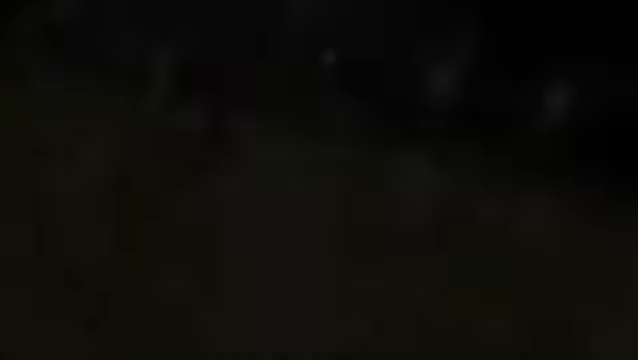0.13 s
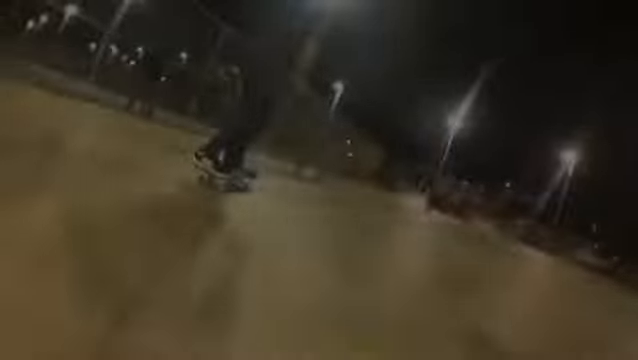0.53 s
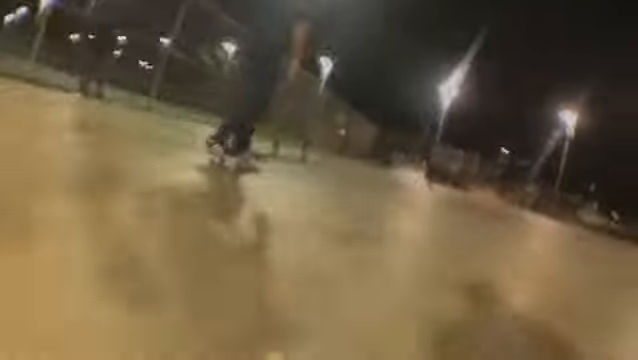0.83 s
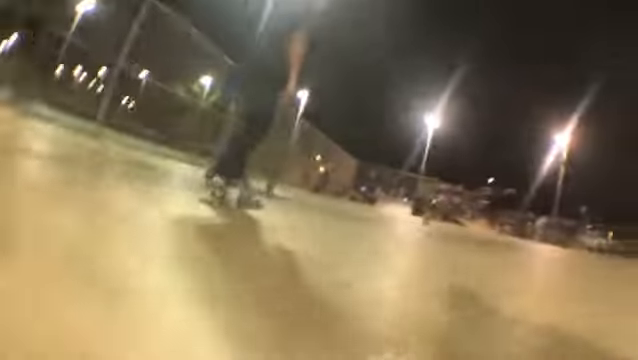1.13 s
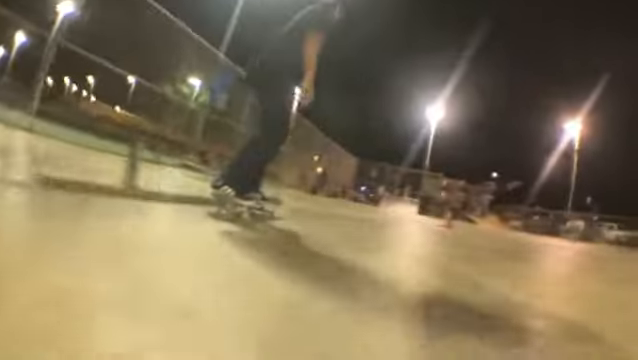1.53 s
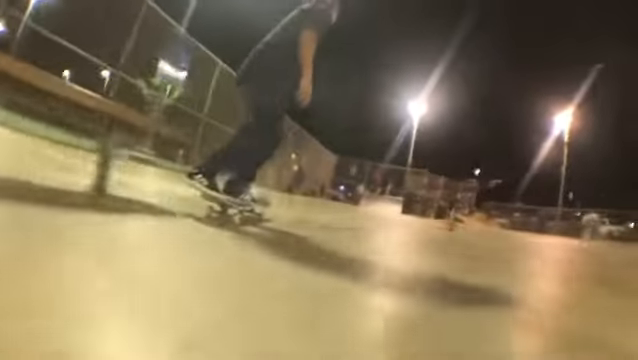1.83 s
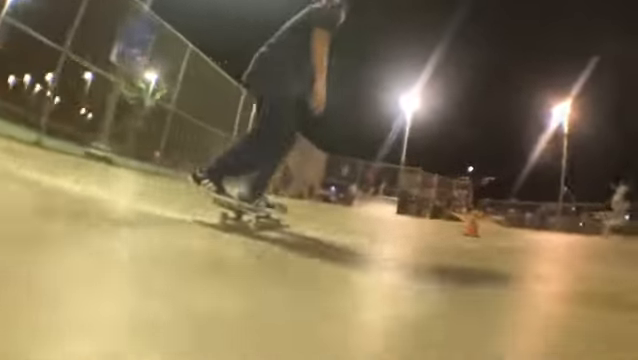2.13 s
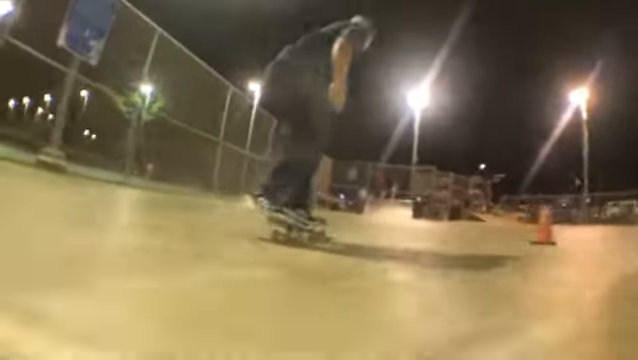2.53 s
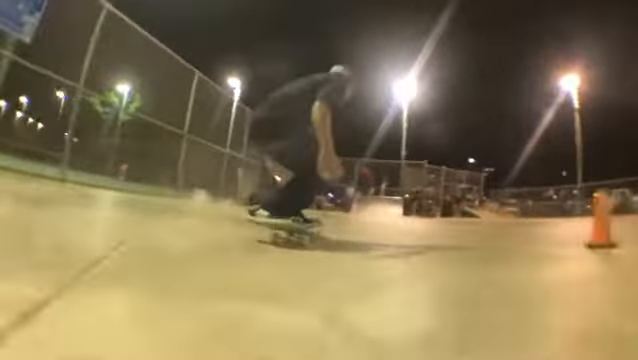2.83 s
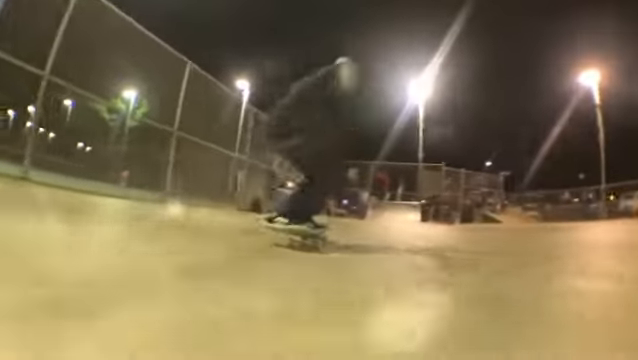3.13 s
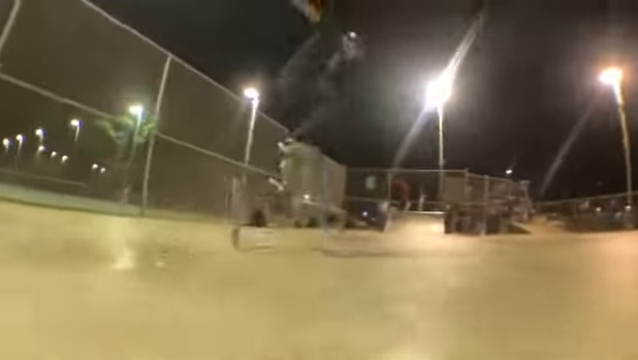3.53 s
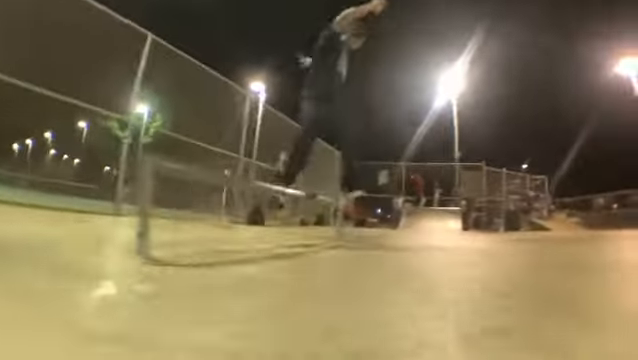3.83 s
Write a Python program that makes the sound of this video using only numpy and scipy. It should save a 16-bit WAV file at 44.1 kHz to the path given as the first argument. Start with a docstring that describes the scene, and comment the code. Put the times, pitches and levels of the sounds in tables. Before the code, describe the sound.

Skateboard wheels roar over gritty concrete, then a sharp pop and metallic clatter on a rail.

```python
"""Night, concrete, a stereo pair: two skateboards fade in, one close below the microphones, one ahead.
Grit shakes wheels, decks and trucks into roar, rumble, rattle and hiss; joints in the slab knock as bursts.
Halfway the board ahead pops, and bumps then boom in the near deck as damped low modes.
Late on it strikes a steel rail, whose modes ring unsteadily under a noisy clatter; brief squeaks,
made of wavering sines, follow as the rolling grows quieter."""
import sys
import numpy as np
from scipy import signal
from scipy.fft import rfft, irfft
from scipy.io import wavfile

SR = 44100
rng = np.random.default_rng(int(sys.argv[2]) if len(sys.argv) > 2 else 0)


def unload_wav(signal):
    """Save mono or channel-first audio to the path in sys.argv[1] as 16-bit WAV at rate SR, clipped to [-1, 1]."""
    wavfile.write(
        sys.argv[1],
        SR,
        np.round(np.clip(np.atleast_2d(signal).T, -1, 1) * 32767).astype(np.int16),
    )


def to_linear_factor(level_db):
    """Convert decibel levels (scalar or array-like) to linear amplitude factors."""
    exponent = np.asarray(level_db, float) / 20
    return 10 ** exponent


N = 176400   # samples: 4 s
T = np.arange(N) / SR

# Levels of the rolling as it fades in and passes. Each row: time in seconds, wheel roar in dB,
# deck rumble in dB, hiss of grit in dB, truck rattle in dB.
ROLLING_LEVELS = [(.12, -41.5, -55.5, -60.5, -58), (.3, -37, -41.5, -56.5, -53.5),
                  (.45, -34.5, -40, -47.5, -46), (.61, -30.5, -35, -46.5, -48.5),
                  (.805, -27.5, -38, -44, -43.5), (.84, -22, -31, -41.5, -38.5),
                  (.98, -21.5, -30, -40, -35.5), (1.15, -26.5, -33.5, -41, -38.5),
                  (1.3, -24.5, -31.5, -42.5, -37.5), (1.58, -24, -28.5, -39.5, -35.5),
                  (1.85, -24.5, -26.5, -40, -35), (2.04, -25.5, -31.5, -38, -36.5),
                  (2.19, -29, -25.5, -43.5, -37), (2.43, -26.5, -32, -41, -36.5),
                  (2.6, -27.5, -28.5, -38, -35), (2.7, -32, -33, -48, -40), (2.8, -23, -23.5, -40.5, -34),
                  (2.95, -26, -24.5, -44.5, -37), (3.16, -27.5, -28.5, -44.5, -38),
                  (3.28, -28, -27, -43, -38), (3.36, -32, -34.5, -48, -43),
                  (3.6, -37.5, -38.5, -44.5, -43.5), (3.85, -41.5, -39, -49, -50),
                  (4.0, -35.5, -41.5, -49, -41.5)]
# Level of the deepest rumble. Each row: time in seconds, level in dB.
DRONE_LEVELS = [(.12, -58), (.6, -41.5), (1.2, -34.5), (1.8, -34.5), (2.4, -37), (3.0, -37), (3.5, -39),
                (3.85, -51), (4.0, -32)]
# Resonances of wheels, decks and trucks, and of the deepest rumble. Each row: centre in Hz, width of one
# of two stacked resonators in Hz, relative level in dB, left over right in dB, phase lead of the right
# microphone in radians, likeness of the two microphones from 0 to 1.
ROAR_MODES = [(343.5, 145, -7.5, 1, -1.5, 0.61), (482, 180, -5.5, 8, -1.5, 0.63),
              (706, 220, -5, 10.5, -1.47, 1), (852, 196, -7.5, 13.5, -2.5, 0.87),
              (937, 93, -1.5, 3.5, -1.5, 0.84), (1149, 220, -3, 1.5, -0.5, 0.69),
              (1345, 153, -3, -4.5, -0.2, 0.68), (1500, 140, 0, -4.5, 0.5, 0.62),
              (1694, 122, -8.5, -5, 0.1, 0.36)]
RUMBLE_MODES = [(132.8, 27.7, 0.5, 0.5, -1.36, 0.94), (168, 47, -2, -2, -1.07, 0.75),
                (209, 131, -5.5, 2.5, -1.22, 0.8)]
RATTLE_MODES = [(2156, 160, 6, -3, -9, 0.79), (2830, 860, 0.5, 0, -2.5, 0.94),
                (3400, 1160, -1.5, 4, -3.5, 0.71), (4300, 1200, -4.5, 3.5, 1.65, 1),
                (5440, 3160, -4.5, 0.5, -1, 0.17)]
DRONE_MODES = [(45.5, 10, 1, .5, -1.1, .15), (73.8, 51, 6.7, 0.37, -0.15, 0.16)]
# Spectrum of the hiss. Each row: frequency in Hz, relative density in dB per Hz.
HISS_SPECTRUM = [(3000, -28), (5000, -9), (7000, -3), (9000, 3), (11000, -1.5), (13000, -5.5),
                 (15000, -6.5), (16500, -60.5)]
# Pitch of the wheels' whine. Each row: time in seconds, frequency in Hz.
WHINE_PITCH = [(.5, 4300), (.9, 4000), (1.1, 4300), (1.3, 4200), (1.45, 4350), (1.58, 4250), (1.8, 4450),
               (1.95, 4300), (2.4, 4300), (3.3, 4200)]
# Knocks of wheels, tail and trucks. Each row: start in seconds, then crack, low knock, body, clack and
# snap in dB before the stereo spread, length in seconds before the stretch of its band.
KNOCKS_HEARD = [(0.2, -38.5, -37.5, -51, -66, -64, 0.0041), (0.4544, -24.5, -43, -31, -36, -28.5, 0.004),
                (0.8227, -36, -50, -33.5, -59, -52, 0.0079), (1.925, -32, -51, -31, -32, -31, 0.0062),
                (1.953, -27, -39, -26, -39, -37, 0.0063), (2.0634, -22, -20, -26, -44, -44, 0.0032),
                (2.0747, -13.5, -28, -16, -30, -24.5, 0.0038), (2.086, -30, -35.5, -27.5, -35, -41, 0.013),
                (2.102, -19, -40, -40, -37, -33, .002), (2.115, -25.5, -30, -32, -38, -36, 0.0086),
                (2.175, -17.5, -30, -22, -50, -43, 0.003), (2.203, -23.5, -50, -22.5, -55, -56, 0.004),
                (2.497, -24, -32, -33, -31, -42, 0.0031), (2.5345, -13.5, -25.5, -17, -28.5, -39, 0.0076),
                (2.568, -16.5, -30, -17.5, -26.5, -38, 0.012), (2.8, -31, -30, -28, -43, -45, 0.0029),
                (2.813, -30, -23.5, -34, -36, -38, 0.0032), (2.842, -24, -29.5, -30, -41, -28, 0.0024),
                (2.932, -36, -30, -37, -45, -45, 0.0032), (2.9376, -29.5, -23.5, -22, -35, -51, 0.0082),
                (2.976, -40, -36, -32, -44, -55, 0.0094), (3.303, -43, -40, -28, -39, -43, 0.0081),
                (3.316, -14, -19, -10.5, -14.5, -24, 0.008), (3.334, -41, -49, -26, -38, -47, 0.0024),
                (3.454, -47, -52, -31.5, -44, -40, 0.0094), (3.4699, -18, -23, -12, -30, -26, 0.0036),
                (3.4746, -15, -19, -10, -20, -23, 0.0061), (3.496, -42, -45, -29, -30, -41, 0.0051),
                (3.526, -38, -50, -40, -35, -42, 0.0026), (3.581, -54, -49, -33, -52, -52, 0.0039),
                (3.701, -16.5, -16, -13.5, -24, -36, 0.004), (3.721, -49, -34, -27.5, -45, -45, 0.026),
                (3.7434, -15, -28.5, -20.5, -37, -21.5, 0.013),
                (3.7612, -10, -25, -15.5, -21.5, -12.5, 0.0025)]
# Bands of crack, low knock, body, clack, snap. Each row: low edge in Hz, high edge in Hz.
KNOCK_EDGES = [(6000, 12500), (200, 500), (500, 1750), (1750, 3400), (3400, 5500)]
# Deck booms. Each row: start in seconds, strength of the blow in dB.
DECK_BLOWS = [(2.064, -20), (2.539, -18.5), (2.8, -14), (2.814, -13), (2.8442, -6), (2.866, -15),
              (2.931, -9.5), (2.979, -18), (3.025, -18.5), (3.073, -18), (3.746, -17)]
# Modes that a blow rings in the deck. Each row: frequency in Hz, relative level in dB, t60 in seconds.
DECK_MODES = [(144.3, 0, 0.053), (199, -7, 0.058)]
# Knocks with a clear pitch. Each row: start in seconds, frequency in Hz, mean level in dB, t60 in seconds.
PITCHED_KNOCKS = [(0.8248, 1500, -9.5, 0.035), (2.077, 783, -16.5, 0.034), (2.122, 610, -12.5, 0.04),
                  (2.571, 1040, -11, 0.052), (2.944, 1400, -12.5, 0.033), (3.3187, 3200, -10, 0.017),
                  (3.322, 2250, -8.5, 0.023), (3.472, 960, -15, 0.022), (3.5842, 1410, -18, 0.023),
                  (3.704, 2300, -22, 0.03), (3.705, 853, -19.5, 0.35), (3.752, 228, -19.5, 0.12)]
# Strikes on the rail. Each row: start in seconds, strength in dB at 3000 Hz, hardness in dB per octave,
# clatter in dB before the stereo spread.
RAIL_STRIKES = [(3.478, -27.5, -1.5, -24.5), (3.701, -40, -10, -30), (3.745, -30, 6, -19),
                (3.763, -38.5, -10, -30)]
# Rail modes. One value each: frequency in Hz.
RAIL_PITCHES = [846, 3008, 3431, 3554, 4565, 5157, 5372, 5940, 6097, 8159, 8407, 8716, 8922, 9200, 9380,
                9543, 9610, 9691, 9800, 10504, 12870, 13573, 14400, 15300]
# The same modes in the same order. Each row: relative level in dB, t60 in seconds.
RAIL_RINGS = [(-9.5, 1.04), (-10.5, 1.4), (-14, .12), (-12, .15), (-4, 0.23), (-4.5, 0.38), (-26, 0.69),
              (0, 0.25), (-15, 0.34), (-5, 1.05), (2, 0.27), (-10, .17), (-14, 0.2), (-14, 0.11),
              (-10, 0.26), (-5.5, 0.29), (4.5, 0.24), (0.5, 0.12), (-12, 0.26), (-3, 0.23), (-25, 0.36),
              (-26, .14), (-15, .14), (-19, 0.52)]
# Rail modes too crowded to tell apart. Each row: frequency in Hz, relative density in dB per Hz.
CLATTER_SPECTRUM = [(1000, 6), (2500, -19), (4500, 5), (6500, -14), (9000, 10), (12000, -26), (16000, -21)]
# Brief squeaks. Each row: start in seconds, centre frequency in Hz, peak level in dB, length in seconds.
SQUEAKS_HEARD = [(3.66, 4620, -42, 0.019), (3.969, 4540, -37.5, 0.024)]

START_S, START_RISE_S = 0.12, 0.0081
GRIT_PER_S, GRIT_SPREAD_DB = 1600, 3
LAG_ABOVE_HZ, LEFT_LAG_S = 3800, 0.0002155   # this treble reaches the right microphone first
KNOCK_RISE_S, KNOCK_T60_S, KNOCK_TAIL_DB, KNOCK_TAIL_T60_S = 0.0056, 0.02, -25.5, 0.36
CRACK_STRETCH, THUD_STRETCH = 0.77, 1.6   # against the body: cracks are quicker, low knocks last longer
TOCK_WAVER_DB = 3
RAIL_STEADY, RAIL_WAVER_PER_S = 0.8, 60   # steady share of a mode's ring, rate of the rest
RAIL_LUCK_DB, CLATTER_T60_S = 0.76, 0.21
RATTLE_CUT_HZ, RATTLE_DB = 6400, -1   # level against the rattle curve
WHINE_DB, WHINE_PATCHY_DB = -11, 1   # level against the rattle curve
WHINE_WIDTH_HZ, WHINE_WANDER_HZ = 290, 70.1
TOP_HZ = 16600


def rms_one(x):
    """Scale to rms 1."""
    return x / np.sqrt(np.mean(x ** 2) + 1e-20)


def drift(rate):
    """Slow chance with spread 1: noise through two equal lowpass poles at rate Hz, on every 40th sample."""
    r = np.exp(-80 * np.pi * rate / SR)
    noise = rng.standard_normal(N // 40 + 2002)
    slow = signal.lfilter([1], [1, -2 * r, r * r], noise)[2000:]
    return np.interp(np.arange(N) / 40, np.arange(len(slow)), rms_one(slow))


def coloured(x, spectrum):
    """Give noise a spectrum; rms 1."""
    hz, db = np.transpose(spectrum)
    f = np.maximum(np.fft.rfftfreq(N, 1 / SR), 1)
    gain = to_linear_factor(np.interp(np.log(f), np.log(hz), db, left=-90))
    return rms_one(irfft(rfft(x) * gain, N))


def grit():
    """Dense random grains of uneven size under the wheels; rms 1."""
    size_db = GRIT_SPREAD_DB * np.minimum(rng.exponential(1, N), 5)
    size = to_linear_factor(size_db) * rng.choice([-1, 1], N)
    return rms_one(size * (rng.random(N) < GRIT_PER_S / SR))


def lagged(x, apart):
    """One sound at two microphones, its treble late on the left; a share of other sound sets them apart."""
    f = np.fft.rfftfreq(N, 1 / SR)
    late = np.where(f > LAG_ABOVE_HZ, np.exp(-2j * np.pi * f * LEFT_LAG_S), 1)
    left = irfft(rfft(x + apart) * late, N)
    return np.array([left, x - apart])


def body(modes, patchy_db):
    """Grit shakes each resonance, which reaches the two microphones in its own way; rms 1."""
    f, out = np.fft.rfftfreq(N, 1 / SR), 0
    shared, own = [rfft(grit()), rfft(grit())], rfft(grit())
    together = drift(9.0)
    for k, (hz, width, db, pan_db, lead, alike) in enumerate(modes):
        peak = 1 / (1 + 1j * (f ** 2 - hz ** 2) / (np.maximum(f, 1) * width)) ** 2
        alike = np.clip(alike, 0, 1)
        left = shared[k % 2]   # neighbouring modes take different grit
        right = (alike * left + np.sqrt(1 - alike ** 2) * own) * np.exp(1j * lead)
        pair = irfft(peak * np.array([left * to_linear_factor(pan_db / 2), right * to_linear_factor(-pan_db / 2)]), N)
        patches = 0.31 * together + drift(12.8)
        out = out + pair * to_linear_factor(db + patchy_db * patches)
    return rms_one(out)


def ring(clicks, hz, t60):
    """A unit click sets a damped sine of starting height 1 ringing."""
    r, w = to_linear_factor(-60 / (t60 * SR)), 2 * np.pi * hz / SR
    return signal.lfilter([0, np.sin(w)], [1, -2 * r * np.cos(w), r * r], clicks + 1e-18)


def rolling_level(column):
    """Level of one part of the rolling over time, as a factor."""
    rows = np.transpose(ROLLING_LEVELS)
    return to_linear_factor(np.interp(T, rows[0], rows[column]))


def wheel_roar():
    """Grit excites the middle resonances of the rolling wheels."""
    return rolling_level(1) * body(ROAR_MODES, patchy_db=1.21)


def knocks():
    """Each knock is banded noise that swells from its start and begins to die after its length."""
    out, t = np.zeros((2, N)), T[:SR // 5]
    stretches = [CRACK_STRETCH, THUD_STRETCH, 1, 1, 1]
    for k, (low_hz, high_hz) in enumerate(KNOCK_EDGES):
        sos = signal.butter(3, [low_hz, high_hz], "band", fs=SR, output="sos")
        pair, stretch = np.zeros((2, N + SR)), stretches[k]
        for s, *levels, length in KNOCKS_HEARD:
            length = max(length, 0.001) * stretch
            after = np.maximum(t - length, 0) / stretch
            rise = np.minimum(t / (KNOCK_RISE_S * min(stretch, 1)), 1)
            tail = to_linear_factor(KNOCK_TAIL_DB - 60 * after / KNOCK_TAIL_T60_S)
            shape = rise * (to_linear_factor(-60 * after / KNOCK_T60_S) + tail)
            burst = signal.sosfilt(sos, shape * rng.standard_normal((2, len(t))))
            power = np.sum(burst ** 2, axis=1, keepdims=True) / np.sum(shape ** 2)
            at = int(s * SR)
            pair[:, at:at + len(t)] += to_linear_factor(levels[k]) * burst / np.sqrt(power)
        burst, other = pair[:, :N]
        if k == 0:   # only the crack is late on the left
            out += lagged(burst, 0.038 * other)
        else:
            out += burst + 0.76 * other * [[1], [-1]]
    return out


def rail():
    """Every strike sets all modes ringing unsteadily, plus a clatter of modes too crowded to tell apart."""
    out, rows = np.zeros(N), np.array(RAIL_STRIKES)
    start, strength_db, hardness = rows[:, 0], rows[:, 1], rows[:, 2]
    chance = rng.normal(0, RAIL_LUCK_DB, (len(RAIL_RINGS), len(rows)))
    for hz, (db, t60), luck in zip(RAIL_PITCHES, RAIL_RINGS, chance):
        clicks = np.zeros(N)
        clicks[(start * SR).astype(int)] = to_linear_factor(strength_db + db + hardness * np.log2(hz / 3000) + luck)
        waver = RAIL_STEADY + np.sqrt(1 - RAIL_STEADY ** 2) * drift(RAIL_WAVER_PER_S)
        out += ring(clicks, hz, t60) * waver
    shape = np.zeros(N)
    for s, _, _, db in RAIL_STRIKES:
        shape += (T >= s) * to_linear_factor(db - 60 * np.maximum(T - s, 0) / CLATTER_T60_S)
    clatter, other = [shape * coloured(rng.standard_normal(N), CLATTER_SPECTRUM) for _ in range(2)]
    return lagged(out + clatter, 0.51 * other)


def tocks():
    """A short, unsteady ring at each pitched knock, the same at both microphones."""
    out = np.zeros(N)
    for s, hz, db, t60 in PITCHED_KNOCKS:
        out += ring(to_linear_factor(db) * (np.arange(N) == int(s * SR)), hz, t60)
    out = out * to_linear_factor(TOCK_WAVER_DB * drift(65.0))
    return np.array([out, out])


def thuds():
    """Bumps under the near board ring the low modes of its deck, through a soft contact."""
    rows, clicks = np.array(DECK_BLOWS), np.zeros(N)
    clicks[(rows[:, 0] * SR).astype(int)] = to_linear_factor(rows[:, 1])
    out = sum(to_linear_factor(db) * ring(clicks, hz, t60) for hz, db, t60 in DECK_MODES)
    out = signal.sosfilt(signal.butter(2, [95, 320], "band", fs=SR, output="sos"), out)
    return np.array([out, np.roll(out, 20)])   # right microphone 20 samples later


def deck_rumble():
    """Grit shakes the low resonances of the decks."""
    return rolling_level(2) * body(RUMBLE_MODES, patchy_db=2.32)


def whine():
    """Wheel whine: grit in a narrow resonance whose centre wanders, louder on the left; rms 1."""
    lowpass = signal.butter(2, WHINE_WIDTH_HZ / 2, fs=SR, output="sos")
    slow = signal.sosfilt(lowpass, [grit(), grit()])
    hz = np.interp(T, *np.transpose(WHINE_PITCH)) + WHINE_WANDER_HZ * drift(6.0)
    phase = 2 * np.pi * np.cumsum(hz) / SR
    band = slow[0] * np.cos(phase) + slow[1] * np.sin(phase)
    band = band * to_linear_factor(WHINE_PATCHY_DB * drift(4.5))
    return rms_one(np.array([band * to_linear_factor(7.0), np.roll(band, -2)]))   # right 2 samples earlier


def truck_rattle():
    """Grit shakes the trucks' higher resonances; the wheels' whine rides along, both dulled on top."""
    dull = signal.butter(6, RATTLE_CUT_HZ, fs=SR, output="sos")
    rattle = to_linear_factor(RATTLE_DB) * body(RATTLE_MODES, patchy_db=1.84)
    return rolling_level(4) * signal.sosfilt(dull, rattle + to_linear_factor(WHINE_DB) * whine())


def squeaks():
    """Short tones that swell and fade while their pitch wavers."""
    out = 0
    for s, hz, db, length in SQUEAKS_HEARD:
        shape = np.sin(np.pi * np.clip((T - s) / length, 0, 1))
        phase = 2 * np.pi * np.cumsum(hz + 60 * drift(162.0)) / SR
        out = out + to_linear_factor(db) * shape * np.sin(phase)
    return lagged(out, 0 * out)


def grit_hiss():
    """Fine noise mixed with grains, coloured as treble hiss, in flickering patches."""
    fine = rng.standard_normal((2, N)) + 0.5 * grit()
    apart = 0.023 * coloured(fine[1] - fine[0], HISS_SPECTRUM)
    sizzle = lagged(coloured(fine[0], HISS_SPECTRUM), apart)
    return rolling_level(3) * sizzle * to_linear_factor(1.45 * drift(9.6))


def low_drone():
    """The deepest rumble: grit in broad resonances at the bottom of the range."""
    return to_linear_factor(np.interp(T, *np.transpose(DRONE_LEVELS))) * body(DRONE_MODES, patchy_db=0.5)


def scene():
    """All sources at the two microphones; silence before the start."""
    rolling = wheel_roar() + deck_rumble() + truck_rattle() + grit_hiss() + low_drone()
    blows = knocks() + rail() + tocks() + thuds()
    return (rolling + blows + squeaks()) * np.clip((T - START_S) / START_RISE_S, 0, 1)


def band_limit(x):
    """A steep low-pass at the top of the band."""
    return signal.sosfilt(signal.butter(12, 16800, fs=SR, output="sos"), x)


def record(dry):
    """The microphone chain rounds the peaks and cuts the top."""
    rounded = np.tanh(dry)
    mix = signal.sosfilt(signal.cheby2(12, 60, TOP_HZ, fs=SR, output="sos"), rounded)
    return band_limit(mix)


dry = scene()
out = record(dry)
unload_wav(out)
```